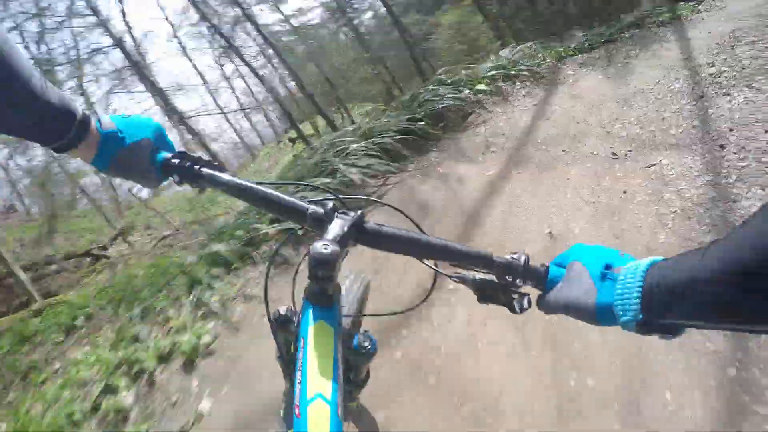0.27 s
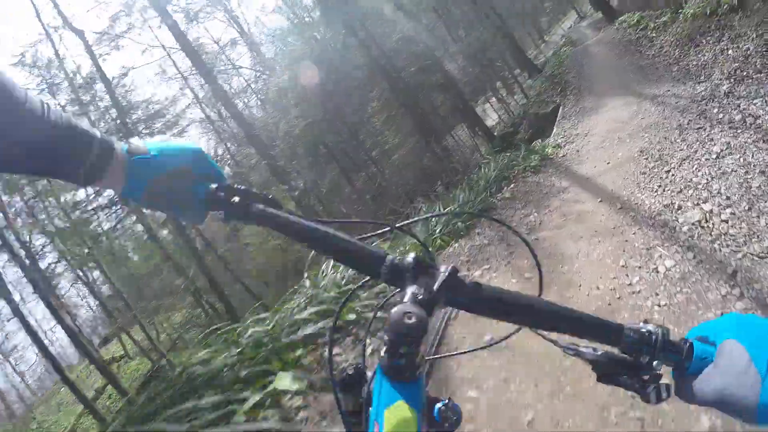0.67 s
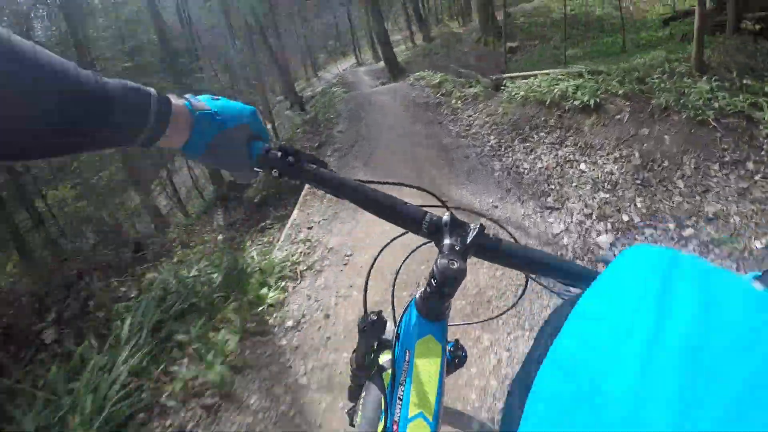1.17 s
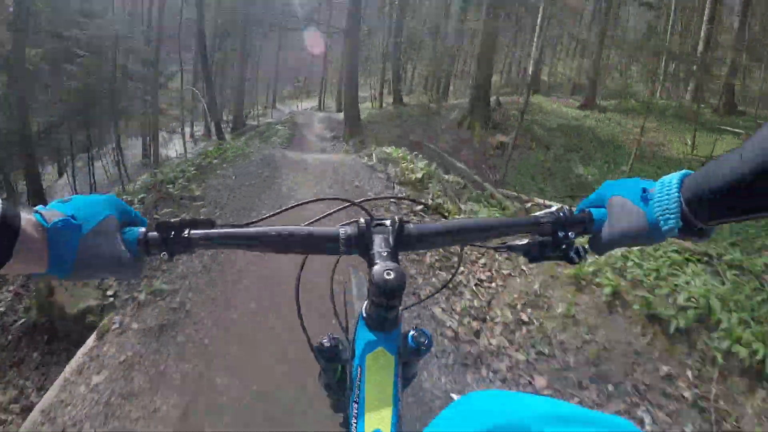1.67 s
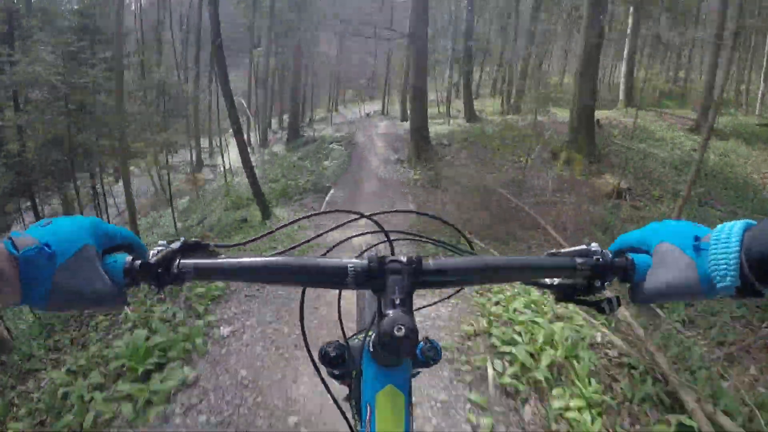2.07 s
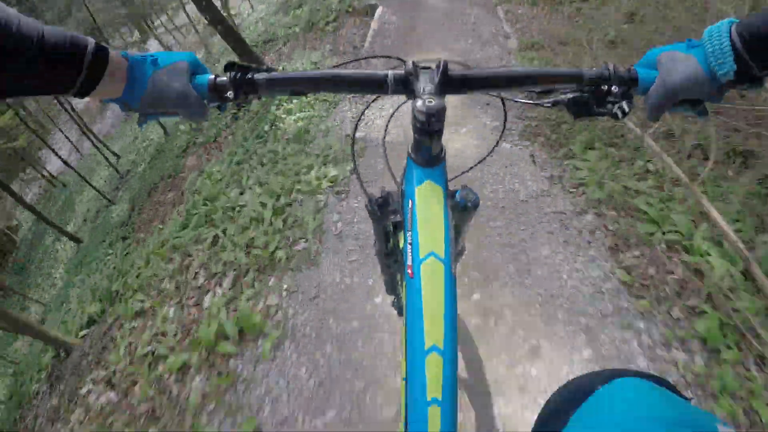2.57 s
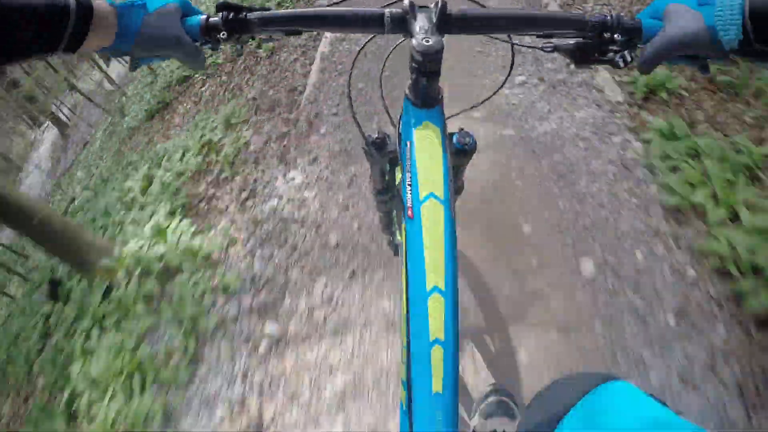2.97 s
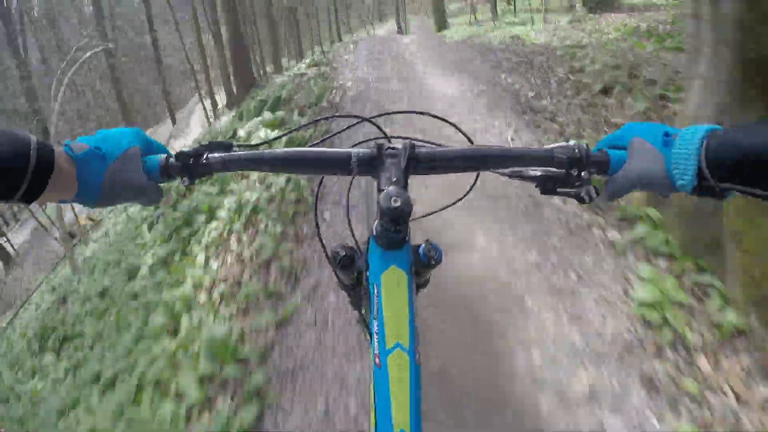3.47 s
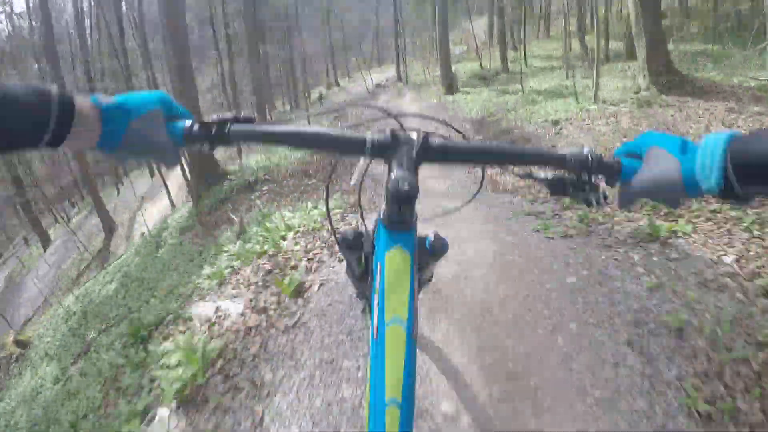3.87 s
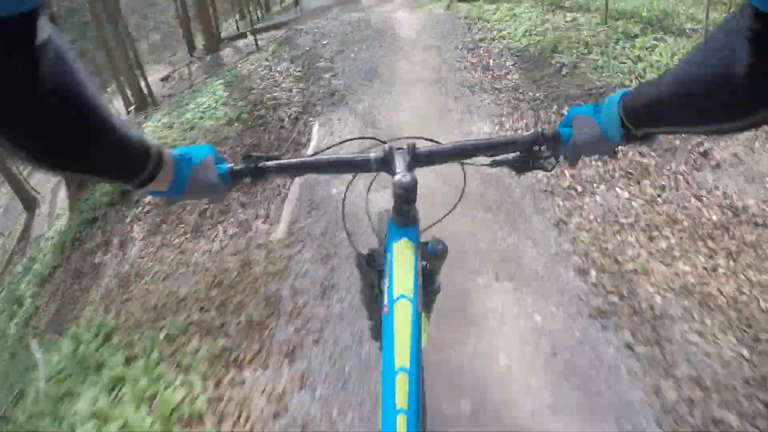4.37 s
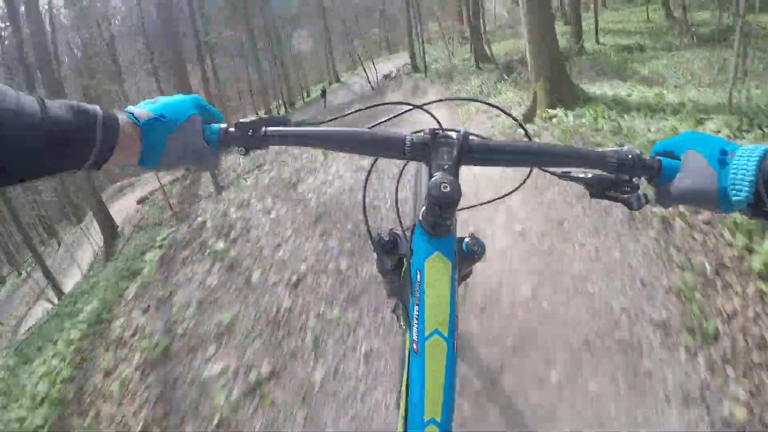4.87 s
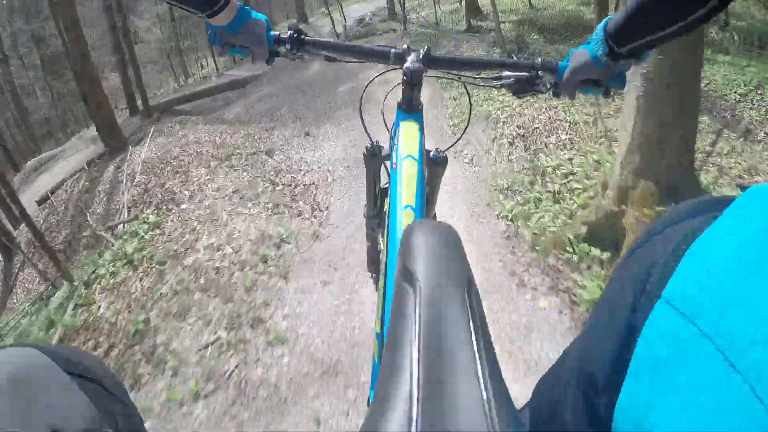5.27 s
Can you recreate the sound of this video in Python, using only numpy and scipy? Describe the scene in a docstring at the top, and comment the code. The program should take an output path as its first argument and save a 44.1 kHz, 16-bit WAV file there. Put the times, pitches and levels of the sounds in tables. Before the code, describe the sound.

Fast gravel ride heard from a cased chest-worn camera: boxy crunching tyres, gritty hiss, heavy jolts, rattling chain, flicked stones and buffeting wind.

```python
"""A mountain bike runs fast down a gravel forest trail, heard from a cased camera on the rider's chest.
It opens in crunch, grit hiss and drumming tyres, with wind flutter and a run of jolts; the chain rattles at 1.3 s.
Cables knock near 2 s as the gravel thins out; jolts and crunch return at 3 s, then more chain and flung stones.
Crunch and wind peak near 4.7 s and ease off after a last jolt; bumps rub the clothing and shake the mount throughout.
Noise and tiny impacts are filtered into each texture, clacks ring damped modes and each jolt is one brief swing."""
import sys
import numpy as np
from scipy import signal
from scipy.fft import rfft, irfft, next_fast_len
from scipy.io import wavfile
from scipy.ndimage import map_coordinates

SR = 44100
rng = np.random.default_rng(int(sys.argv[2]) if len(sys.argv) > 2 else 0)


def log_audio(samples):
    """Write samples as a 16-bit WAV file to the path given in sys.argv[1]."""
    # one column per channel
    frames = np.atleast_2d(samples).T
    # limit to full scale, then quantise
    limited = np.clip(frames, -1, 1)
    pcm = np.round(limited * 32767).astype(np.int16)
    wavfile.write(sys.argv[1], SR, pcm)


N = 242991


def amp(db):
    """Decibels to gain."""
    return 10 ** (np.asarray(db) / 20)


def unit(x):
    """x at rms 1."""
    return x / np.sqrt(np.mean(x ** 2) + 1e-20)


def along(points, hz):
    """(Hz, value) points read on a log frequency axis."""
    point_hz, value = np.transpose(points)
    return np.interp(np.log(hz + 1), np.log(point_hz + 1), value)


def curve(rows):
    """(seconds, value) points joined into one value per sample."""
    s, value = np.transpose(rows)
    return np.interp(np.arange(N) / SR, s, value)


def wobble(rate):
    """A smooth random curve, rate knots a second."""
    knots = rng.standard_normal(int(N * rate / SR) + 4)
    return map_coordinates(knots, [np.arange(N) * rate / SR])


def coloured(x, gain_db):
    """x through a causal minimum-phase filter whose gain in dB is a function of frequency."""
    m = 2 * next_fast_len(N // 2 + SR // 4)
    cepstrum = irfft(np.log(amp(gain_db(np.fft.rfftfreq(m, 1 / SR)))), m)
    # folding the cepstrum forward in time makes the filter causal
    cepstrum[1:m // 2] *= 2
    cepstrum[m // 2 + 1:] = 0
    response = np.exp(rfft(cepstrum))
    return irfft(rfft(x, m) * response, m)[:N]


# Resonances of the case. Each row: centre in Hz, width in Hz, boost in dB.
CASE_RESONANCES = [(631.6, 9.7, 12), (960, 400, 7.5), (1470, 470, 6.5), (1786, 36, 4.5), (2435, 145, 6),
                   (3653, 510, 9), (4350, 320, 7.5), (9150, 460, 0), (13500, 370, -9)]


def cased(x, spectrum):
    """x with its own spectrum and the hollow resonances of the case, at rms 1."""
    def gain_db(hz):
        boost = sum(db / (1 + (2 * (hz - centre) / width) ** 2) for centre, width, db in CASE_RESONANCES)
        return along(spectrum, hz) + boost
    return unit(coloured(x, gain_db))


def ringing(x, modes):
    """x through a set of damped resonances, with little left above or below them."""
    m = next_fast_len(len(x) + 4096)
    f = np.fft.rfftfreq(m, 1 / SR)
    response = 0
    for k, (centre, width, db) in enumerate(modes):
        resonance = 1j * f * width / (centre * centre - f * f + 1j * f * width)
        response = response + (-1) ** k * amp(db) * resonance  # neighbours alternate in sign
    skirts = signal.butter(3, [modes[0][0] / 2, modes[-1][0] * 1.4], "bandpass", analog=True)
    return irfft(rfft(x, m) * response * signal.freqs(*skirts, f)[1], m)[:len(x)]


def grains(rate, spread_db):
    """Random tiny impacts, rate a second, varying in strength by spread_db."""
    hit = rng.random(N) < rate / SR
    strength = amp(spread_db * np.minimum(rng.standard_normal(N), 2.5))
    return unit(hit * rng.choice([-1, 1], N) * strength)


# The bumps of the trail. Each row: middle in seconds, length in seconds, then relative levels in dB
# of clothing rub, mount chatter and tyre drumming.
TRAIL_BUMPS = [(0.057, 0.02, -38.5, -35.5, -56), (0.116, 0.039, -45, -37, -50),
               (.205, 0.069, -37.5, -55, -37), (0.317, .06, -37.5, -58, -37.5),
               (0.442, 0.045, -41, -43, -37.5), (0.663, 0.073, -33, -34, -34.5),
               (0.766, 0.025, -46, -32.5, -48), (0.962, 0.02, -40, -46, -40),
               (1.072, 0.056, -39, -55, -38.5), (1.23, 0.09, -47.5, -43.5, -52),
               (1.307, 0.059, -42, -37.5, -43), (1.425, 0.068, -40.5, -47, -41.5),
               (1.471, 0.016, -48, -37.5, -52), (1.524, 0.057, -45, -43.5, -43.5),
               (1.739, 0.076, -34.5, -45.5, -41.5), (1.956, 0.047, -40.5, -66, -36),
               (2.083, 0.081, -42, -58, -41), (2.428, 0.053, -43, -34.5, -41.5),
               (2.513, .036, -51, -42.5, -47), (2.808, 0.036, -40.5, -36, -40),
               (2.883, 0.14, -45, -47.5, -52), (3.032, 0.023, -44, -50, -37.5),
               (3.159, 0.13, -37.5, -60, -34.5), (3.414, .06, -48, -60, -39),
               (3.499, 0.063, -41.5, -41.5, -44), (3.913, 0.024, -37.5, -51, -53),
               (4.238, 0.082, -44, -42, -45), (4.567, 0.091, -35, -41, -29),
               (5.185, 0.084, -37, -61, -41.5), (5.332, 0.17, -49, -45, -48)]


def heaving(axis):
    """Bell-shaped swells of the bumps, as a gain for the rub (0), the chatter (1) or the drumming (2)."""
    t = np.arange(N) / SR
    power = np.zeros(N)
    for s, length, *levels_db in TRAIL_BUMPS:
        bell = np.exp(-np.minimum((2 * (t - s) / length) ** 2, 100))
        power += amp(levels_db[axis]) ** 2 * bell
    return np.sqrt(power)


def pebbles(rate, pitch_hz=2300, scatter=0.374, spread_db=3):
    """Single stones snap against each other, rate a second, each a short decaying ring at its own pitch."""
    cycles = 11  # ringing falls 30 dB in this many
    stones = round(rate * N / SR)
    start = rng.integers(0, N, stones)
    pitch, size = rng.standard_normal((2, stones))
    hz = np.clip(pitch_hz * np.exp(scatter * pitch), 700, 12000)[:, None]
    t = np.arange(SR // 80) / SR
    strength = amp(spread_db * np.minimum(size, 1))[:, None]
    rings = strength * np.sin(2 * np.pi * hz * t) * amp(-60 * hz * t / (2 * cycles))
    places = start[:, None] + np.arange(len(t))
    return np.bincount(places.ravel(), rings.ravel(), N)[:N]


# How hard the tyres dig into the gravel. Each row: time in seconds, relative crunch level in dB.
DIG_CURVE = [(0.0, -45), (0.15, -47), (0.47, -50.5), (0.66, -48), (0.88, -51.5), (1.34, -50), (1.53, -56.5),
             (1.74, -54), (1.94, -51), (2.12, -59), (2.41, -61), (2.55, -52.5), (3.14, -47), (3.4, -50),
             (3.75, -44.5), (4.01, -50.5), (4.24, -49.5), (4.36, -46), (4.65, -42.5), (4.87, -43),
             (5.05, -46), (5.33, -58), (5.48, -59.5)]
# Fine grit leaving the tread. Each row: time in seconds, relative hiss level in dB.
HISS_CURVE = [(0.0, -59), (0.82, -60.5), (1.72, -68), (2.4, -71), (2.96, -64), (4.18, -65), (4.81, -59.5),
              (5.48, -64.5)]
# The casings drumming on the ground. Each row: time in seconds, relative level in dB.
DRUM_CURVE = [(0.0, -41), (0.3, -58), (0.41, -49), (0.76, -52.5), (1.26, -57), (1.74, -58), (1.89, -53),
              (2.27, -55), (3.25, -46), (3.98, -49.5), (4.18, -48), (4.47, -42), (5.48, -48)]
# Colours of crushed gravel, snapping stones, grit and drumming. Each row: frequency in Hz, relative gain in dB.
GRAVEL_COLOUR = [(150, -6.5), (350, -5), (600, -9.5), (1150, -16), (1550, -5), (2100, -4), (2800, -4.5),
                 (3300, -5.5), (4100, -17.5), (4700, -28), (6000, -25), (8000, -29), (15000, -48)]
PEBBLE_COLOUR = [(500, -28), (1200, -9), (1550, -2.5), (2200, 5.5), (2900, -2.5), (3900, 0.5), (4900, -5.5),
                 (7000, -41), (15000, -39)]
GRIT_COLOUR = [(2500, 3.5), (5000, 6.5), (7200, 2.5), (8000, -1.5), (9600, 3), (11800, -5), (13400, 0.5),
               (15400, -7.5)]
DRUM_COLOUR = [(25, -36), (55, 5.5), (90, 3), (120, 3.5), (150, -5), (180, -6), (215, -13.5), (245, -11.5),
               (350, -27.5), (700, -21.5), (2000, -106)]


def tyres(crunch_db=-1, hiss_db=7.0, clump_db=2.0, dig_grows=1.15, crackle_db=-9, flung_db=-27, handful_db=1.0,
          drum_db=3):
    """Knobs crush the gravel in uneven clumps, fine grit hisses and the casings drum on the ground."""
    crunch = curve(DIG_CURVE)
    dig = dig_grows * (crunch - crunch.mean())
    clumps = clump_db * wobble(70)
    crushed = amp(clumps) * cased(grains(rate=7000, spread_db=1.0), GRAVEL_COLOUR)
    # the harder the tyres dig in, the more the big stones are thrown about
    digging = amp(dig - dig.max())
    small = cased(pebbles(450), PEBBLE_COLOUR)
    big = 1.15 * digging * cased(pebbles(120), PEBBLE_COLOUR)
    handfuls = amp(handful_db * wobble(35))  # loose stones come in handfuls
    crunching = amp(crunch.mean() + dig + crunch_db) * (crushed + handfuls * (small + big))

    spurts = 1.6 * wobble(22)  # dB: grit leaves the tread in spurts
    grit = grains(rate=9700, spread_db=4.0) + amp(crackle_db) * grains(rate=150, spread_db=9.5)
    bumps = heaving(axis=2)
    flung = np.hypot(amp(curve(HISS_CURVE) + hiss_db), amp(flung_db) * bumps)  # each bump throws up more
    hissing = flung * amp(clumps + spurts) * cased(grit, GRIT_COLOUR)

    load = np.hypot(amp(drum_db + curve(DRUM_CURVE)), bumps)
    rumble = unit(coloured(rng.standard_normal(N), lambda hz: along(DRUM_COLOUR, hz)))
    drumming = load * amp(1.35 * wobble(30)) * rumble
    return crunching + hissing + drumming


# Colour of the rubbing fabric. Each row: frequency in Hz, relative gain in dB.
CLOTH_COLOUR = [(120, 6), (350, -9), (600, -4.5), (950, 0.5), (1250, -2), (1600, -1), (2300, 6), (3000, 3),
                (3700, -5.5), (4700, -9.5), (6100, -11), (6900, -26), (15000, -29)]


def clothing(level_db=-1, rough_db=2):
    """Bumps slide the fabric, which sticks and slips in short rasping strokes."""
    slips = grains(rate=3500, spread_db=4.0) * amp(rough_db * wobble(160))
    return amp(level_db) * heaving(axis=0) * cased(slips, CLOTH_COLOUR)


# What the chattering mount rings. Each row: centre in Hz, width in Hz, relative level in dB.
MOUNT_RESONANCES = [(632, 27, -3), (994, 110, -17), (2372, 116, 0), (2550, 34, 2.5), (2980, 320, -12),
                    (3745, 280, -13.5)]


def mount(rate=92, uneven=0.25, level_db=-1):
    """The shaken mount scrapes in quick uneven bursts, about rate a second, that ring the case."""
    cycle = np.cumsum(rate * np.exp(uneven * wobble(60))) / SR % 1
    bursts = np.exp(-2 * cycle) * rng.standard_normal(N)
    return amp(level_db) * heaving(axis=1) * unit(ringing(bursts, MOUNT_RESONANCES))


# What a clack rings with, in five groups: thud, knock, ring, clink and tick.
# Each row within a group: centre in Hz, width in Hz, relative level in dB.
CLACK_RESONANCES = [
    [(432, 187, 3.5), (615, 470, 1), (940, 224, 4.5)],
    [(890, 62, -20), (1475, 374, -1), (1807, 182, 8.5)],
    [(2385, 94, 6), (3080, 350, -15)],
    [(3607, 190, 4.5), (4170, 630, -17)],
    [(6350, 2200, 14.5), (7600, 240, -19.5), (9650, 1500, -5), (13300, 1500, -14)],
]
# Cables knock on the frame and fall back once.
# Each row: start in seconds, relative level in dB, thud in dB, flight to the second touch in seconds.
CABLE_KNOCKS = [(0.2512, -44.5, 1.5, 0.041), (.623, -44, 8, .03), (0.6403, -33.5, -2.5, 0.019),
                (1.0155, -56, 13, .02), (1.9141, -40, -3, 0.023), (2.0116, -32, -3.5, .019),
                (2.096, -31, -7.5, 0.031), (2.9387, -40, -11, .025), (3.1065, -33, -12, 0.022),
                (3.5164, -39.5, -1.5, 0.027), (4.463, -34, -16, 0.014), (4.564, -36, -4, 0.023),
                (5.0878, -34.5, -11, 0.026)]
# The chain slaps and rattles on.
# Each row: start in seconds, relative level in dB, thud in dB, skitter in dB, number of contacts.
CHAIN_SLAPS = [(.347, -40.5, -1, -14, 1), (0.7886, -45.5, 0, -8, 1), (1.2709, -35, -8, -3, 1),
               (1.2983, -31, -23, -6, 1), (1.3019, -28.5, -13.5, -4, 2), (1.3205, -32.5, -10, -6, 1),
               (3.503, -36.5, -5, -15, 3), (4.1746, -34.5, -7, -10, 1), (4.1962, -37, -3, -13, 3),
               (4.2288, -42, -4, -12, 1), (4.2883, -35.5, -5.5, -15, 6)]
# Lighter touches of a rattle. One change in dB each for thud, knock, ring, clink and tick.
RATTLE_THINNING = (-4, -2, -6, 0, -6)
# Stones pop from under the tyres. Each row: start in seconds, relative level in dB, pitch in Hz.
STONE_POPS = [(.754, -35, 2440), (.7665, -34.5, 2450), (1.215, -43, 2400), (1.322, -30, 2350),
              (2.9525, -34.5, 2200), (3.057, -31, 2600), (3.6133, -33.5, 1770), (3.88, -37, 2050),
              (3.9744, -37.5, 2230), (4.445, -32.5, 1910), (4.4814, -38, 2100), (4.518, -33, 2250),
              (4.598, -25.5, 2450), (4.871, -30, 2340)]
# Grit ticks against the case. Each row: start in seconds, relative level in dB.
GRIT_TICKS = [(.1386, -51), (0.5122, -47.5), (0.5976, -43), (.811, -44), (1.1597, -50), (1.3114, -48),
              (1.5393, -51), (2.5585, -55), (3.1892, -56), (4.6856, -48)]


def contacts():
    """Every touch of cables, chain, stones and grit as (s, dB, dB of each group of modes, skitter dB)."""
    touches = []
    # mixes give thud, knock, ring, clink and tick in dB; skitter is in dB against the first touch
    for s, db, thud_db, flight in CABLE_KNOCKS:
        mix = (thud_db, 0, -3.5, -10.5, -23)
        touches.append((s, db, mix, -15))
        touches.append((s + flight, db - 15.5, mix, -15))  # the second, weaker touch

    rattle_s, fall_db = 0.0093, 5  # time between contacts; loss each time their count doubles
    for s, db, thud_db, skitter_db, count in CHAIN_SLAPS:
        mix = np.array([thud_db, -5, -0.5, -1, -23])
        for k in range(round(count)):
            thinned = mix + (k > 0) * np.array(RATTLE_THINNING)
            touches.append((s + k * rattle_s, db - fall_db * np.log2(k + 1), thinned, skitter_db))

    # modes away from a stone's pitch ring less; the loudest mode stands for its group
    group_hz = np.array([max(modes, key=lambda mode: mode[2])[0] for modes in CLACK_RESONANCES])
    loss_db_per_octave = 24.5
    for s, db, hz in STONE_POPS:
        touches.append((s, db, -loss_db_per_octave * np.abs(np.log2(group_hz / hz)), -19.5))

    for s, db in GRIT_TICKS:
        touches.append((s, db, (-18, -12, 3, 3.5, -4.5), -13))  # grit is too light to thud
    return touches


def clacks(thud_db=-8, knock_db=-6, ring_db=-7, clink_db=-6, tick_db=-7, skitter_t60=0.021):
    """Each contact lands and skitters for a few milliseconds; its kind sets which modes ring."""
    t = np.arange(SR // 20) / SR
    trims_db = (thud_db, knock_db, ring_db, clink_db, tick_db)
    out = np.zeros(N + SR)
    for s, db, parts_db, skitter_db in contacts():
        blow = amp(skitter_db - 60 * t / skitter_t60) * rng.standard_normal(len(t))
        blow[0] += 1  # the first touch
        start = round(s * SR)
        for modes, part_db, trim_db in zip(CLACK_RESONANCES, parts_db, trims_db):
            out[start:start + len(t)] += amp(db + part_db + trim_db) * unit(ringing(blow, modes))
    return out[:N]


# Jolts that shove air in and out of the case.
# Each row: middle in seconds, level in dB before the bell-shaped fade, swing in Hz.
CASE_JOLTS = [(0.081, -20.5, 19.4), (0.179, -22.5, 125), (0.223, -9.5, 21.4), (0.381, -15.5, 10.8),
              (0.491, -8, 17.2), (0.634, -10, 24), (0.72, -15.5, 18), (0.794, -13, 16),
              (0.879, -12.5, 18.6), (1.606, -12.5, 22), (2.581, -21.5, 24), (2.941, -13, 15),
              (3.099, -7.5, 20), (3.157, -20.5, 13.7), (3.43, -17.5, 15.2), (5.103, -16, 98),
              (5.136, -7.5, 19)]


def jolts(cycles=0.49):
    """Each jolt gives the microphone one push and pull, mostly slow: a sine swing under a bell-shaped fade."""
    t = np.arange(N) / SR
    out = np.zeros(N)
    for s, db, hz in CASE_JOLTS:
        near = np.abs(t - s) < 2 / hz
        turn = (t[near] - s) * hz
        out[near] -= amp(db) * np.sin(2 * np.pi * turn) * np.exp(-(turn / cycles) ** 2)
    return out


# Strength of the wind buffeting. Each row: time in seconds, relative level in dB.
GUST_CURVE = [(0.0, -33.5), (0.5, -31), (1.14, -31), (1.26, -36), (1.94, -38), (2.37, -38.5), (2.9, -33),
              (3.05, -31), (3.31, -31), (3.54, -36), (3.71, -40), (4.35, -32), (4.55, -28), (4.78, -29),
              (4.88, -34.5), (5.23, -32), (5.48, -36.5)]
# Colours of the deep flutter and the rush of air. Each row: frequency in Hz, relative gain in dB.
BUFFET_COLOUR = [(5, -16), (12, 4.5), (22, -2.5), (36, -1), (55, -16), (90, -20.5), (200, -57), (600, -100)]
AIR_COLOUR = [(100, -3), (300, -3.5), (800, -17.5), (2400, -8.5), (4000, -17.5), (6000, -31), (15000, -31)]


def wind(level_db=2.5, gust_db=1.1, air_db=-56):
    """Eddies tumble over the case as a deep flutter, above a steady soft rush of air."""
    eddies = unit(coloured(rng.standard_normal(N), lambda hz: along(BUFFET_COLOUR, hz)))
    gusts = amp(curve(GUST_CURVE) + level_db + gust_db * wobble(24))
    rush = amp(air_db) * cased(rng.standard_normal(N), AIR_COLOUR)
    return gusts * eddies + rush


def whine(hz=14165, level_db=-84, waver_hz=18, flicker_db=3):
    """A faint thin whine, a high sine that wavers in pitch and flickers in level."""
    tone = np.sin(2 * np.pi * np.cumsum(hz + waver_hz * wobble(60)) / SR)
    return amp(level_db) * unit(tone * amp(flicker_db * wobble(12)))


def scene():
    """Everything meets at the one microphone."""
    return (tyres() + clothing() + mount() + clacks() + jolts() + wind() + whine())[None]


def record(dry):
    """The camera keeps nothing above its band limit."""
    top_hz = 15480
    m = next_fast_len(N + SR // 2)
    kept = np.fft.rfftfreq(m, 1 / SR) < top_hz
    return irfft(rfft(dry, m) * kept, m)[..., :N]


dry = scene()
out = record(dry)
log_audio(out)
```